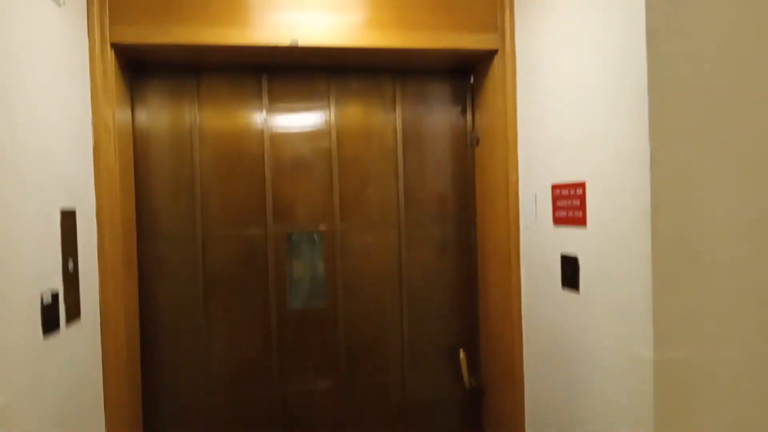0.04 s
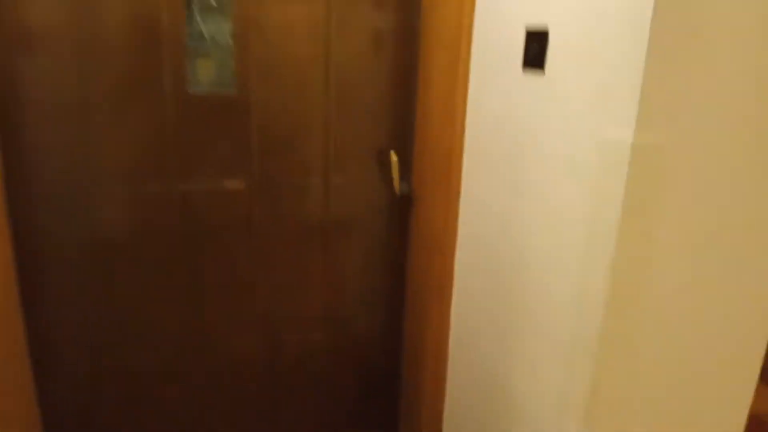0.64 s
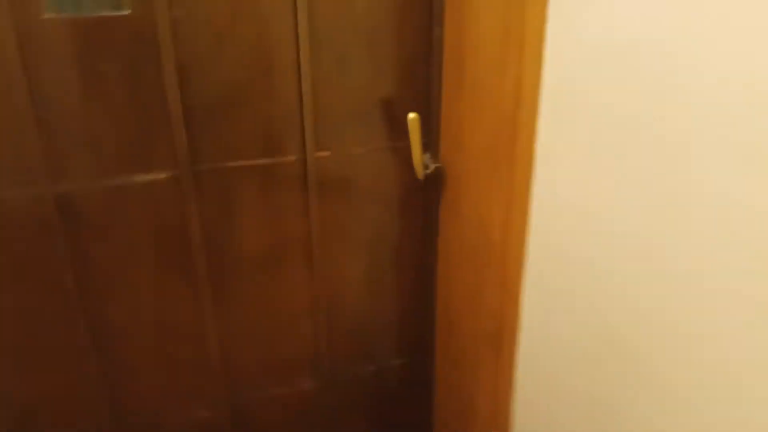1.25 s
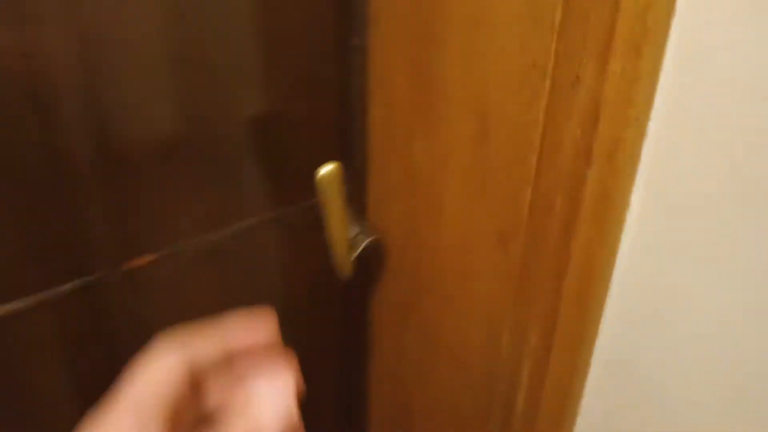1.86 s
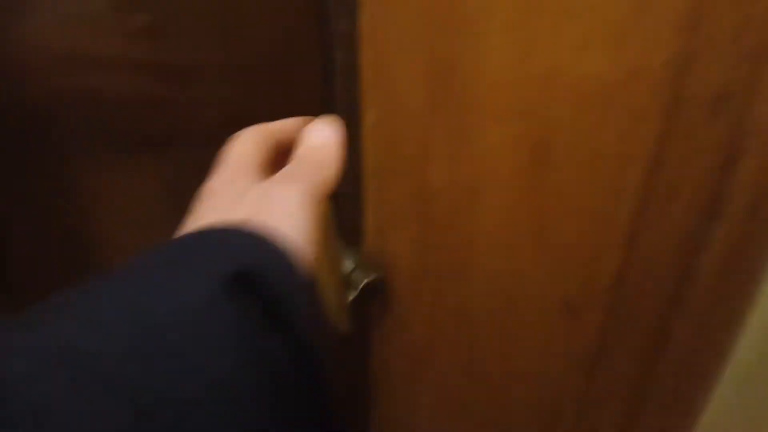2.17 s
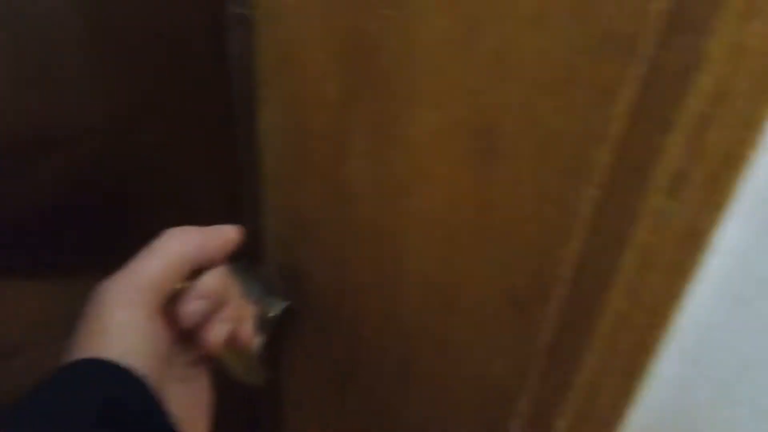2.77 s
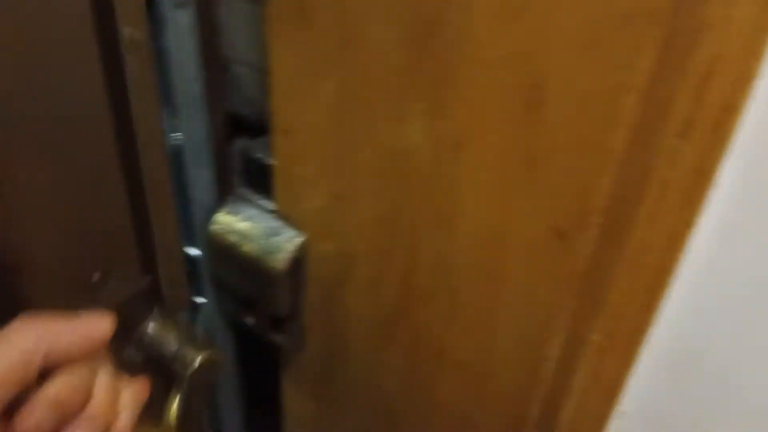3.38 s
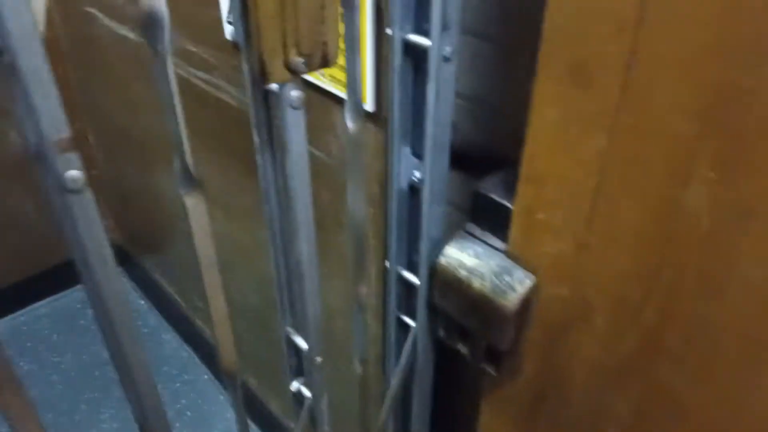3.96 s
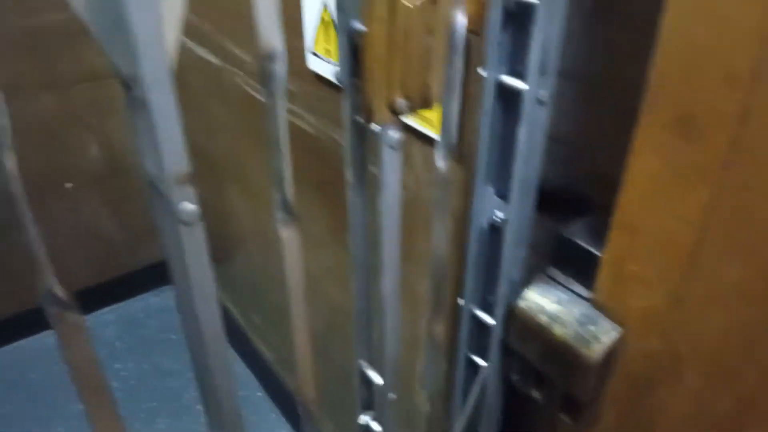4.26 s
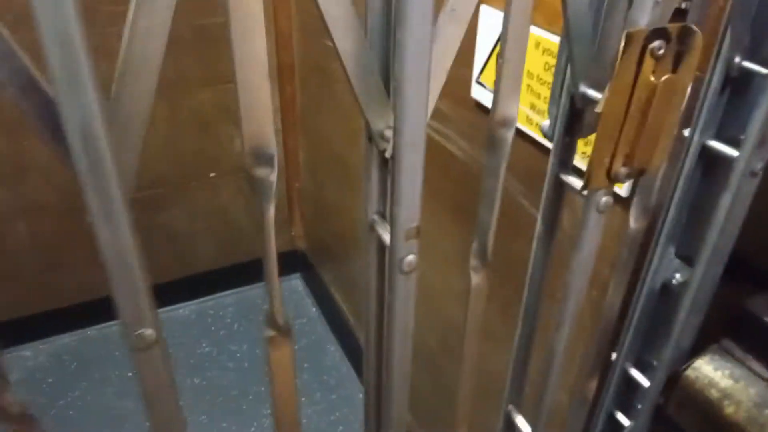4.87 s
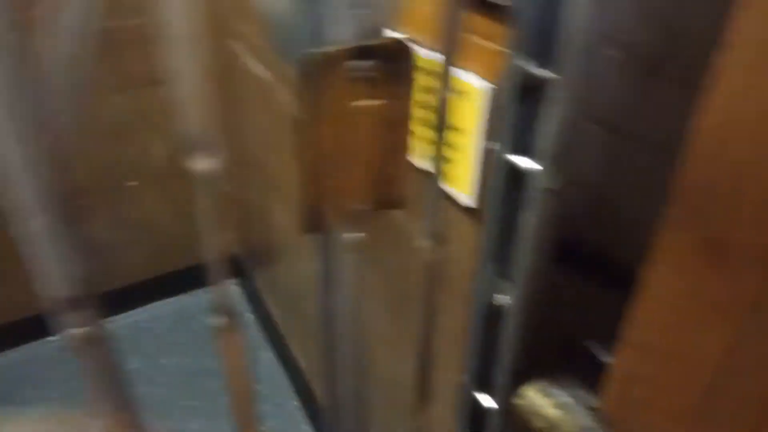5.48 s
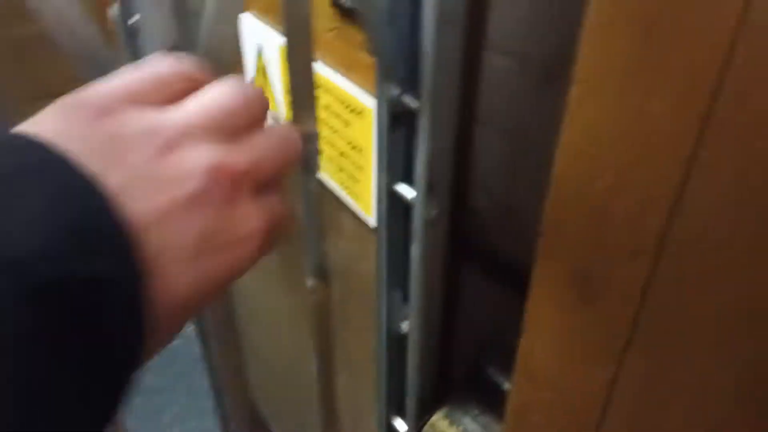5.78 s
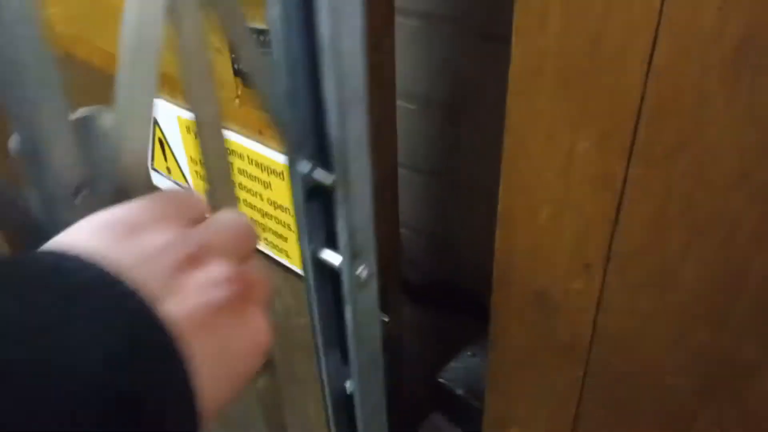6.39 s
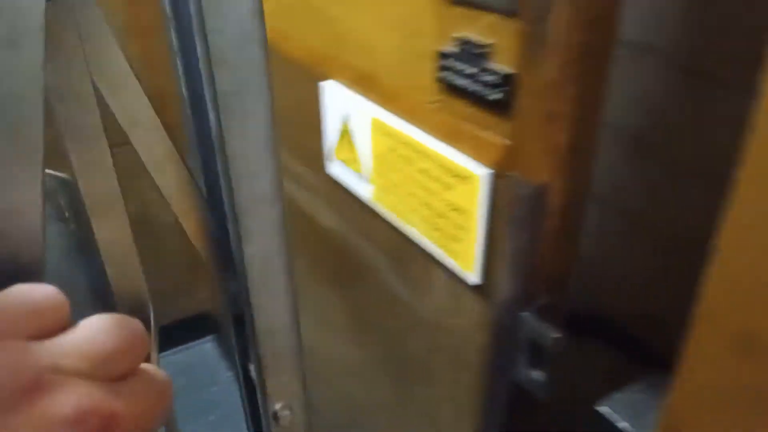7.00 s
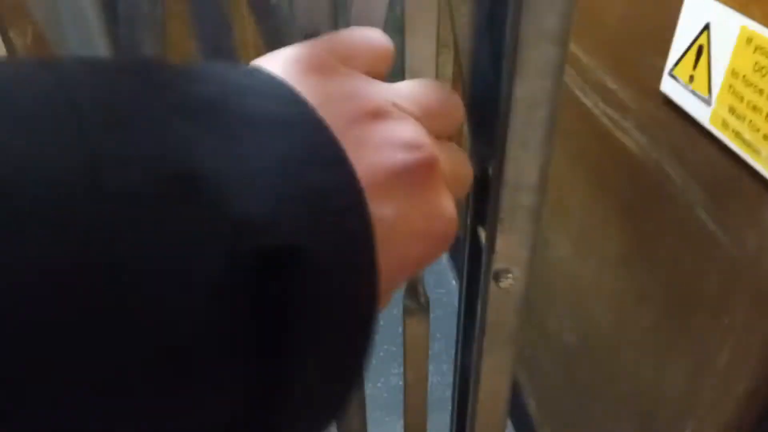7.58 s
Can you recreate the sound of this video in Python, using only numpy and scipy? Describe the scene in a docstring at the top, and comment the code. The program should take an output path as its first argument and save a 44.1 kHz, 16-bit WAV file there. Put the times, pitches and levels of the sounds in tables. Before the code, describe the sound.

In a small hallway, a few heels thump and a coat rustles faintly as someone walks up to an old elevator. The latch clacks and knocks, then the wooden door scrapes free and rolls open with squeaks, clinks and a juddering rumble. After a short lull, the folding steel gate is pushed aside with a loud, high screech and clanking bars. The microphone is close.

```python
"""Small hallway, old lift. Someone walks up, heels thumping, coat rustling, and unlatches the wooden door.
Impacts thud in the panel and ring the steelwork. The door scrapes free, rolls on a gritty track and
judders, amid brief squeaks and clinks. The hanging car booms as it is leaned on. The folding steel gate
is pushed open: its dry pivots stick and slip in a screech while the bars clank."""
import sys
import numpy as np
from scipy import signal
from scipy.fft import rfft, irfft, next_fast_len
from scipy.io import wavfile
from scipy.ndimage import uniform_filter1d

SR = 44100
rng = np.random.default_rng(int(sys.argv[2]) if len(sys.argv) > 2 else 0)


def wav_out(sig):
    """Save sig, one row per channel (or a flat mono array), as 16-bit PCM at SR to the path in sys.argv[1]."""
    wavfile.write(sys.argv[1], SR, np.round(np.clip(np.atleast_2d(sig).T, -1, 1) * 32767).astype(np.int16))


N = 336924
TIME = np.arange(N) / SR
TAIL_TIME = TIME[:SR // 2]

# spectra of room tone and coat rustle, each with a thin high hiss: f/Hz, level/dB
ROOM_SPECTRUM = [(25, -24.5), (50, 2.5), (150, 3.5), (280, -5.5), (600, -16.5), (1800, -14.5),
                 (3600, -23.5), (6200, -17.5), (8400, -43), (13500, -43), (15500, -19.5)]
RUSTLE_SPECTRUM = [(1000, -22), (2300, -6.5), (3800, -11), (5700, -0.5), (6900, -3.5), (8500, -25.5),
                   (13000, -27), (15500, -7)]
# coat movements: t/s, length/s, level/dB
RUSTLES = [(.5, 1.56, -69.5), (1.25, 0.22, -62), (2.25, 0.19, -67), (5.0, 0.31, -58.5),
           (5.32, 0.026, -52.5), (5.52, 0.19, -61), (5.8, 0.16, -68.5), (7.5, .13, -68)]
# footfalls and soft bumps: t/s, peak/dB, t60/s
STEPS = [(0.807, -56, 0.44), (1.057, -59, .2), (1.351, -24.5, 0.072), (1.372, -28.5, 0.22),
         (1.526, -42.5, 0.71), (1.606, -35.5, 0.24), (1.797, -31, 0.3), (2.003, -27, 0.1),
         (2.203, -53.5, 0.46), (2.45, -43, 0.95), (3.186, -20, 0.043), (3.511, -27, 0.07),
         (5.276, -49, 0.13), (5.419, -48, 0.12), (5.483, -45, 0.25), (5.725, -44, 0.18),
         (5.839, -49.5, 0.57), (6.837, -24, 0.14), (7.232, -50, 0.16)]
# shoe scuffs, low body of latch knocks, metal jingle, gate clank: t/s, length/s, f/Hz, level/dB
NOISE_BURSTS = [(0.792, 0.13, 1480, -59.5), (0.796, 0.027, 3600, -61), (0.814, 0.15, 328, -57),
                (.864, 0.085, 900, -56), (0.867, 0.096, 3520, -63.5), (1.055, 0.065, 675, -63.5),
                (1.382, 0.13, 1420, -61), (1.586, 0.085, 5250, -62), (1.78, 0.22, 5080, -59),
                (1.882, 0.015, 3530, -51), (1.762, 0.15, 1540, -58.5), (1.846, 0.043, 534, -40.5),
                (1.852, 0.11, 1940, -54), (1.901, 0.026, 834, -53), (2.363, 0.025, 500, -53),
                (2.559, 0.068, 310, -29.5), (2.817, 0.069, 360, -37), (2.954, 0.043, 398, -34.5),
                (3.408, 0.033, 730, -37), (4.12, 0.14, 1500, -49), (4.126, 0.1, 4760, -43),
                (5.534, 0.14, 2180, -70), (6.387, 0.12, 1010, -43), (6.745, 0.064, 1200, -50.5),
                (6.826, 0.04, 5196, -40)]
# squeaks, handle and latch rings, metal clinks: t/s, length/s, f/Hz, level/dB
BRIEF_TONES = [(1.056, .04, 2970, -62.5), (1.21, 0.027, 4450, -63), (2.22, 0.11, 5620, -61),
               (3.535, 0.18, 5080, -37.5), (3.545, 0.098, 5803, -37), (3.6, 0.052, 6220, -41),
               (3.65, 0.05, 2590, -42.5), (3.828, 0.067, 6640, -38.5), (3.837, 0.02, 1150, -41.5),
               (3.835, 0.041, 4560, -41.5), (3.855, 0.063, 1852, -46), (3.895, 0.036, 6800, -42),
               (3.98, 0.06, 1370, -52.5), (4.13, .07, 1100, -51), (4.244, 0.14, 4760, -39),
               (6.158, 0.37, 262, -58), (6.752, 0.026, 1214, -40.5), (6.758, 0.024, 958, -41.5),
               (7.3, 0.13, 4340, -44.5), (7.31, 0.083, 2810, -46), (7.394, 0.05, 1916, -53.5)]
# modes of panel and floor, and of the steelwork: f/Hz, level/dB, t60 factor
WOOD_MODES = [(79.3, 7, 1.32), (113, 6.5, 1.2), (152, 11.5, 0.8), (169, 1.5, 1.77), (219.5, -1, 1.13),
              (251, -2, 0.46), (305, -9, 1.7), (390, -13.5, 1.6)]
STEEL_MODES = [(1210, -17, 0.37), (1503, -5, 0.83), (2283, -1.5, 0.8), (2650, -33, 0.42),
               (3260, -9.5, 0.93), (4700, -3.5, 0.34), (5100, -2, 1), (4860, -1, 0.43), (5830, 11, 0.25),
               (6430, 1.5, 0.7), (6460, -2, 0.49), (9590, 5.5, 0.65), (10660, 1.5, 0.74), (11000, -6, 0.4)]
# latch, door and gate impacts: t/s, thud/dB, clack/dB, ring/dB, t60/s
KNOCKS = [(2.555, -35, -34.5, -37.5, 0.083), (2.565, -29.5, -39, -40.5, 0.24),
          (2.607, -29.5, -45, -47, 0.31), (2.683, -56, -52.5, -47, 0.12), (2.709, -41.5, -48.5, -51, 0.45),
          (2.821, -28.5, -34, -44, 0.21), (2.85, -37, -37, -36.5, 0.15), (2.929, -45, -40, -37, 0.046),
          (2.951, -28, -40.5, -39, .15), (2.974, -29.5, -36, -40.5, .06), (3.002, -35, -37, -36, 0.16),
          (3.061, -39, -39, -32.5, 0.19), (3.125, -44, -48, -31, 0.053), (3.411, -35, -42, -55, 0.14),
          (3.485, -37, -51, -63, 0.076), (3.537, -74, -89, -34.5, 0.2), (3.729, -71, -48.5, -48.5, 0.18),
          (3.828, -60, -51, -44, 0.16), (3.894, -57, -48, -43.5, 0.12), (4.065, -46, -62, -51, 0.18),
          (4.22, -44, -52, -45, 0.15), (5.712, -66, -65, -73, 0.018), (5.831, -74, -66.5, -67.5, 0.17),
          (5.934, -76, -59, -60, .15), (6.362, -56, -41.5, -39, 0.3), (6.39, -54, -32.5, -38, 0.096),
          (6.397, -49, -32, -54, 0.058), (6.975, -80, -46, -37, 0.28), (7.118, -79, -42, -67, 0.19)]
# heaves of the hand: t/s, length/s, level/dB
DOOR_HEAVES = [(2.58, 0.067, -37.5), (2.84, 0.075, -29.5), (2.96, .03, -27.5), (3.04, 0.43, -32.5),
               (3.62, 0.32, -39), (3.98, 0.32, -54)]
GATE_HEAVES = [(5.309, 0.73, -61.5), (6.099, 0.9, -52.5), (6.75, 0.071, -32.5), (6.833, 0.06, -29),
               (6.941, 0.02, -34.5), (7.033, .03, -38), (7.153, 0.16, -45)]
# spectra of the shaken frame: f/Hz, level/dB
DOOR_RUMBLE_SPECTRUM = [(21, -35), (35, -27), (59, -3), (80, 10.5), (129, -9), (157, 2), (172, 2),
                        (232, -14), (284, -0.5), (373, -7), (405, -26.5), (435, -11.5), (600, -17.5),
                        (780, -43), (1320, -120)]
GATE_RUMBLE_SPECTRUM = [(21, -57), (35, -19), (97, 1.5), (114, -1), (176, 0), (267, -18.5), (305, -15.5),
                        (351, -28), (425, -17), (600, -25.5), (780, -62), (1320, -120)]
# door's scraping force and rolling speed: t/s, level/dB
SCRAPE_LEVEL = [(2.9, -58.5), (3.022, -36.5), (3.04, -43), (3.236, -34.5), (3.254, -30.5), (3.39, -31),
                (3.482, -44), (3.49, -35.5), (3.53, -49)]
ROLL_LEVEL = [(3.57, -58), (3.614, -47.5), (3.748, -55.5), (3.808, -57.5), (3.84, -47.5), (4.088, -64),
              (4.166, -48.5), (4.212, -53.5), (4.272, -32.5), (4.44, -28.5), (4.62, -33.5), (4.762, -33.5),
              (4.792, -41), (4.9, -39), (4.966, -55), (5.374, -71), (5.4, -86)]
# scrape, roll and rasp spectra: f/Hz, level/dB
SCRAPE_SPECTRUM = [(240, -50), (400, 17.5), (504, -24.5), (826, -9.5), (1030, -14.5), (1220, -6.5),
                   (1710, -10), (2510, -1.5), (3020, -8.5), (5190, -6), (6340, -2.5), (8900, -22),
                   (13500, -25.5), (15000, -13), (16000, -17.5)]
ROLL_SPECTRUM = [(240, -1), (400, 8), (453, -10), (504, -4.5), (562, -8.5), (765, 4.5), (1350, 6),
                 (2290, 4.5), (3260, -6), (5270, -9), (5960, -2.5), (6740, -8), (8370, -26), (13500, -38.5),
                 (16000, -22)]
RASP_SPECTRUM = [(300, 8.5), (500, -3), (800, -69.5), (1200, -49), (1600, 5), (2500, 0.5), (3800, 6),
                 (5200, 10), (6800, 11), (7600, -16), (8400, -44), (11000, -44), (13500, -33), (15500, -6)]
# track and hanger resonances: f/Hz, width/Hz, level/dB
TRACK_MODES = [(753, 3.9, 13), (825, 29, 3), (1520, 39, -2), (1840, 130, -8), (2270, 120, -6),
               (2820, 25, -21), (3860, 29, -54), (5980, 53, -37), (6640, 430, 13)]
# reflection from the door's edge as the gap opens: t/s, delay/s
GAP_ECHO = [(3.5, 0.0007), (3.85, 0.0012), (4.05, 0.0021), (4.25, 0.001875), (5.0, 0.003)]
# door judder: t/s, fundamental/dB, overtones/dB
JUDDER_LEVELS = [(3.93, -53, -63), (4.01, -36.5, -68), (4.252, -29, -61), (4.316, -34, -41),
                 (4.394, -70, -38.5), (4.514, -36, -41.5), (4.724, -36.5, -49.5), (4.9, -58, -48),
                 (5.03, -48.5, -63), (5.15, -70, -70)]
# judder overtones: multiple, level/dB
JUDDER_OVERTONES = [(2, 1.5), (3, -5.5), (4, -6.5), (5, -9)]
# lift car booms: t/s, length/s, f/Hz, level/dB
CAR_BOOMS = [(5.41, 0.063, 74, -49.5), (5.83, 0.19, 59, -48), (6.715, 0.16, 102, -44.5),
             (6.92, 0.23, 115, -40.5)]
# pushes on the gate: t/s, length/s, tone/dB, rasp/dB
PUSHES = [(6.299, 0.38, -25, -37), (6.712, 0.047, -41, -46.5), (6.821, 0.084, -43, -42),
          (6.925, .2, -24.5, -46.5), (7.202, 0.035, -43, -60), (7.296, 0.13, -38, -61.5)]
# pivot binding: t/s, length/s, level/dB
BINDS = [(6.51, .115, -25.5), (6.98, 0.064, -48)]
# pivot stick-slip pitch: t/s, f/Hz
SCREECH_PITCH = [(6.25, 1603), (6.296, 1526), (6.452, 1486), (6.976, 1512), (6.99, 1483), (7.25, 1506),
                 (7.332, 1484), (7.48, 1501)]
# screech partials: multiple, level/dB
LOW_PARTIALS = [(1, -4.5), (2, 3)]
HIGH_PARTIALS = [(4, -1), (5, -16), (6, -24), (7, -40), (8, -40.5), (9, -43), (10, -39)]
BIND_PARTIALS = [(1.5, -17), (2.5, -12.5), (3.5, -6.5), (4.32, -5), (4.5, 2), (5.5, -20), (6.5, -28)]


def from_db(db):
    """Decibels to gain."""
    return 10 ** (np.asarray(db) / 20)


def rms_one(x):
    """Scale to rms 1."""
    return x / np.sqrt(np.mean(x ** 2) + 1e-20)


def even(x):
    """Flatten slow swells; rms 1."""
    return x / np.sqrt(uniform_filter1d(x * x, size=2600) + 1e-9)


def add(out, start_s, sound):
    """Mix in at start_s."""
    start = int(start_s * SR)
    out[start:start + len(sound)] += sound[:N - start]


def dying(t60_s):
    """Exponential decay, 0.5 s long."""
    return np.exp(-np.log(1000) * TAIL_TIME / t60_s)


def swell(length_s):
    """Envelope: fast rise, slower fall."""
    return np.sin(np.pi * np.linspace(0, 1, int(length_s * SR)) ** 0.37)


def gains(curve, fade_in_s=0.06, fade_out_s=0.13):
    """One gain per dB column, fading beyond the curve's ends."""
    s, *columns = np.transpose(curve)
    inside = np.clip(1 + np.minimum((TIME - s[0]) / fade_in_s, (s[-1] - TIME) / fade_out_s), 0, 1)
    return [inside * from_db(np.interp(TIME, s, db)) for db in columns]


def strokes_db(rows, rise_db_per_s, fall_db_per_s):
    """Rise, hold, fall for rows of t/s, length/s, level/dB; the loudest wins."""
    return np.max([db - rise_db_per_s * np.maximum(s - TIME, 0)
                   - fall_db_per_s * np.maximum(TIME - s - length_s, 0)
                   for s, length_s, db in rows], axis=0)


def stroke_gain(rows, rise_db_per_s, fall_db_per_s):
    """Strokes as a gain."""
    return from_db(np.maximum(strokes_db(rows, rise_db_per_s, fall_db_per_s), -200))


def band(x, low_hz, high_hz, order=3):
    """Causal band-pass."""
    edges_hz = np.clip([low_hz, high_hz], 10, .45 * SR)
    return signal.sosfilt(signal.butter(order, edges_hz, "band", fs=SR, output="sos"), x + 1e-18)


def resonance(x, hz, width_hz):
    """Two-pole resonator, peak gain 1."""
    r = np.exp(-np.pi * width_hz / SR)
    feedback = [1, -2 * r * np.cos(2 * np.pi * hz / SR), r * r]
    return signal.lfilter(np.array([1, 0, -1]) * (1 - r * r) / 2, feedback, x)


def colour(x, spectrum):
    """Filter by a spectrum; rms 1."""
    hz, db = np.transpose(spectrum)
    size = next_fast_len(N)
    bins_hz = np.maximum(np.fft.rfftfreq(size, 1 / SR), 1)
    low_cut = np.minimum(bins_hz / hz[0], 1) ** 2
    shape = from_db(np.interp(np.log(bins_hz), np.log(hz), db))
    return rms_one(irfft(rfft(x, size) * low_cut * shape, size)[:N])


def drift(rate_hz):
    """Smooth random wander; rms 1."""
    r = np.exp(-40 * np.pi * rate_hz / SR)
    slow = signal.lfilter([1], [1, -2 * r, r * r], rng.standard_normal(N // 20 + 2002))[2000:]
    return np.interp(np.arange(N) / 20, np.arange(len(slow)), rms_one(slow))


def grains(per_s, spread_db):
    """Tiny uneven collisions on a rough surface; rms 1."""
    sizes = from_db(spread_db * np.minimum(rng.exponential(1, N), 4)) * rng.choice([-1, 1], N)
    return rms_one(sizes * (rng.random(N) < per_s / SR))


def notes(rows, waver):
    """One swelling, wavering sine per row."""
    out = np.zeros(N)
    wobble = 1 + waver * drift(170)
    for s, length_s, hz, db in rows:
        stroke = swell(length_s)
        phase = 2 * np.pi * hz * np.cumsum(wobble[int(s * SR):][:len(stroke)]) / SR
        add(out, s, from_db(db) * np.sqrt(2) * stroke * np.sin(phase))
    return out


def hall(x, wet_db, bass_t60_s=.45, treble_t60_s=.28):
    """Direct sound plus diffuse hallway tail; treble dies first."""
    noise = rng.standard_normal(SR // 2)
    bass = band(noise, 40, 2740, order=2) * dying(bass_t60_s)
    treble = band(noise, 2000, 11400, order=1) * dying(treble_t60_s)
    tail = (bass + treble) * np.minimum(TAIL_TIME / 0.013, 1)
    wet = from_db(wet_db)
    return (x + wet * signal.fftconvolve(x, tail / np.linalg.norm(tail))[:N]) / np.hypot(1, wet)


def room_tone(far_db=-67.5, near_db=-61.5, walk_s=3):
    """Room tone with a thin high hiss, growing on the way to the shaft."""
    gain = from_db(np.interp(TIME, [0, walk_s], [far_db, near_db]))
    return gain * colour(rng.standard_normal(N), ROOM_SPECTRUM)


def coat():
    """Moving cloth rustles."""
    gain = stroke_gain(RUSTLES, rise_db_per_s=157, fall_db_per_s=191)
    return gain * colour(rng.standard_normal(N), RUSTLE_SPECTRUM)


def noise_bursts():
    """Short band noise: shoe scuffs, low body of latch knocks, metal jingle, gate clank."""
    out = np.zeros(N)
    for s, length_s, hz, db in NOISE_BURSTS:
        noise = rms_one(band(rng.standard_normal(SR // 2), hz / 1.76, hz * 1.28))
        stroke = swell(length_s)
        add(out, s, from_db(db) * stroke * noise[:len(stroke)])
    return hall(out, wet_db=-16.5)


def thud(t60_s, scatter):
    """A soft blow rings the wood's modes over a diffuse boom; peak 1."""
    modes = sum(from_db(db + rng.normal(0, 3)) * np.sin(2 * np.pi * hz * TAIL_TIME) * dying(t60_s * hold)
                for hz, db, hold in WOOD_MODES)
    boom = rms_one(band(rng.standard_normal(SR // 2), 37, 487)) * dying(t60_s * 1.24)
    sound = band(modes + scatter * boom, 65, 270)
    return sound / np.abs(sound).max()


def footsteps():
    """Heels and soft bumps thump the wood."""
    out = np.zeros(N)
    for s, db, t60_s in STEPS:
        add(out, s, from_db(db) * thud(t60_s, scatter=0.34))
    return out


def brief_tones():
    """Short sines: squeaks, handle and latch rings, metal clinks."""
    return hall(notes(BRIEF_TONES, waver=0.02), wet_db=-10.5)


def steel_ring(t60_s, count):
    """Loose steelwork: many unrelated modes, each struck at random strength."""
    modes = np.zeros(SR // 4 + 1, complex)   # 2 Hz bins
    hz = (np.linspace(np.sqrt(400), np.sqrt(16000), count) + rng.uniform(-1, 1, count)) ** 2
    modes[(hz / 2).astype(int)] = rng.standard_normal(count) + 1j * rng.standard_normal(count)
    return rms_one(irfft(modes, SR // 2)) * dying(t60_s)


def steel_blow(t60_s, modes_db=-12, rise_s=0.0015):
    """Struck steel: main modes, dense ring, short crack."""
    modes = sum(from_db(db + modes_db + rng.normal(0, 4))
                * np.sin(2 * np.pi * (hz * TAIL_TIME + rng.random())) * dying(t60_s * hold)
                for hz, db, hold in STEEL_MODES)
    ring = steel_ring(t60_s, count=420)
    crack = 0.58 * rng.standard_normal(SR // 2) * dying(0.0065)
    return (modes + ring + crack) * np.minimum(TAIL_TIME / rise_s, 1)


def knocks(heavy_db=-15, heavy_hz=509, db_per_octave=35, graze_lead_s=0.0067, graze_db=-20):
    """Latch, door and gate impacts ring the steel and thud the panel."""
    metal, wood = np.zeros(N), np.zeros(N)
    for s, thud_db, clack_db, ring_db, t60_s in KNOCKS:
        lowest_hz = heavy_hz * 2 ** ((heavy_db - thud_db) / db_per_octave)   # lighter parts ring higher
        sizzle_db = ring_db - 19 + 0.35 * (ring_db - clack_db)
        blow = band(steel_blow(t60_s), lowest_hz, .45 * SR, order=4)
        clack = band(blow, 227, 2970)
        ring = band(blow, 3900, 6980, order=4)
        sizzle = band(blow, 9700, 17000)
        for db, part in ((clack_db + 1, clack), (ring_db + 2, ring), (sizzle_db, sizzle)):
            contact = from_db(db) * part / np.std(part[:SR // 40])
            add(metal, s, contact)
            add(metal, s - graze_lead_s, from_db(graze_db) * contact)   # loose parts graze first
        add(wood, s, from_db(thud_db + 7) * thud(t60_s, scatter=2.7))
    return hall(metal, wet_db=-10.5) + wood


def frame_rumble():
    """Door and gate shake the wooden frame at each heave."""
    door_gain = stroke_gain(DOOR_HEAVES, rise_db_per_s=700, fall_db_per_s=139)
    gate_gain = stroke_gain(GATE_HEAVES, rise_db_per_s=700, fall_db_per_s=139)
    door_shake = colour(grains(per_s=830, spread_db=-1), DOOR_RUMBLE_SPECTRUM)
    gate_shake = colour(grains(per_s=590, spread_db=0), GATE_RUMBLE_SPECTRUM)
    return from_db(-3.5) * door_gain * door_shake + from_db(-7.5) * gate_gain * gate_shake


def rattling(grit, restless_db, parts):
    """Loose parts ring in turn as the contact point travels."""
    out = np.zeros(N)
    for _ in range(parts):
        drive = grit * from_db(restless_db * drift(9))
        out += signal.fftconvolve(drive, steel_ring(.09, count=170))[:N]
    return rms_one(out)


def sliding(curve, spectrum, chatter, uneven_db, ticks_db, ring_db, track_db, echo,
            hiss_db, dulling_db_per_s):
    """Grit excites track and loose steelwork; the hiss fades as the door moves off."""
    grit = grains(per_s=3100, spread_db=1.5) * chatter * from_db(uneven_db * drift(26))
    grit += from_db(ticks_db) * grains(per_s=40, spread_db=3)
    body = rms_one(grit) + from_db(ring_db) * rattling(grit, restless_db=6, parts=6)
    track = sum(from_db(db) * resonance(body, hz, width_hz) for hz, width_hz, db in TRACK_MODES)
    body = hall(body + from_db(track_db) * track, wet_db=-20.5)
    delay_s = np.interp(TIME, *np.transpose(GAP_ECHO))
    body += echo * np.interp(TIME - delay_s, TIME, body)   # comb sweeps down
    body = colour(body, spectrum)
    mids = even(band(body, 518, 4400, order=4))
    hiss = even(band(body, 3380, .45 * SR, order=4))
    hiss_gain = from_db(hiss_db - dulling_db_per_s * np.maximum(TIME - curve[0][0], 0))
    gain, = gains(curve)
    return gain * (mids + hiss_gain * hiss)


def judder(phase):
    """The door shakes its hangers: a hum with unsteady overtones."""
    fundamental_gain, overtone_gain = gains(JUDDER_LEVELS)
    hum = from_db(1.2 * drift(25)) * fundamental_gain * np.sin(phase)
    for k, db in JUDDER_OVERTONES:
        hum += overtone_gain * from_db(db - 2 + 3 * drift(8)) * np.sin(k * phase + .5 * drift(25))
    return np.sqrt(2) * hum


def door(judder_hz=100.7):
    """The door scrapes free, then rolls; its judder modulates the roller grit."""
    phase = 2 * np.pi * np.cumsum(judder_hz * (1 + 0.0184 * drift(7.4))) / SR
    hum = judder(phase)
    scrape = sliding(SCRAPE_LEVEL, SCRAPE_SPECTRUM, chatter=1, uneven_db=0, ticks_db=-12,
                     ring_db=-7.5, track_db=-14, echo=0.067, hiss_db=5.5, dulling_db_per_s=12.5)
    roll = sliding(ROLL_LEVEL, ROLL_SPECTRUM, chatter=1 + 0.13 * np.cos(phase), uneven_db=1.37,
                   ticks_db=-15, ring_db=-4, track_db=-11, echo=0.18, hiss_db=7, dulling_db_per_s=9)
    return hum + from_db(1) * scrape + from_db(-0.96) * roll


def car_booms():
    """The hanging car booms when leaned on."""
    return notes(CAR_BOOMS, waver=0.076)


def pivot_drive(low_lead_s=0.035, bite_s=0.081):
    """Gains of low, third and high partials and rasp; each push sings first, then bites."""
    lows, highs, bites = [], [], []
    for s, length_s, tone_db, bite_db in PUSHES:
        lag_s = min(bite_s, length_s / 2)
        lows.append((s - low_lead_s, length_s + low_lead_s, -22.5 + 0.67 * tone_db))
        highs.append((s, length_s, tone_db))
        bites.append((s + lag_s, length_s - lag_s, bite_db))
    low_db = strokes_db(lows, rise_db_per_s=1797, fall_db_per_s=653)
    high_db = strokes_db(highs, rise_db_per_s=850, fall_db_per_s=653)
    rasp_db = strokes_db(bites, rise_db_per_s=546, fall_db_per_s=289)
    third_db = 1 + high_db + 0.28 * (rasp_db - high_db)
    return from_db(np.maximum([low_db, third_db, high_db, rasp_db], -200))


def gate_screech(waver=0.00177, jitter=0.00587, flutter_db=2.7, bars_db=5):
    """A dry pivot sticks and slips; its rasp rings the bars, and binding doubles its period."""
    pitch_hz = np.interp(TIME, *np.transpose(SCREECH_PITCH))
    pitch_hz *= 1 + waver * drift(34.4) + jitter * drift(254)
    phase = 2 * np.pi * np.cumsum(pitch_hz) / SR
    low_gain, third_gain, high_gain, rasp_gain = pivot_drive()
    bind_gain = stroke_gain(BINDS, rise_db_per_s=398, fall_db_per_s=350)
    groups = ((low_gain, LOW_PARTIALS, .5), (third_gain, [(3, 0)], .2),
              (high_gain, HIGH_PARTIALS, .17), (bind_gain * from_db(-3), BIND_PARTIALS, .5))
    tone = np.zeros(N)
    for gain, partials, roughness in groups:
        for k, db in partials:
            partial = (1 + roughness * drift(70)) * np.sin(k * phase)
            partial += roughness * drift(110) * np.cos(k * phase)
            tone += gain * from_db(db) * rms_one(partial * from_db(flutter_db * drift(37.5)))
    slips = grains(per_s=4300, spread_db=-3) * (1 + 0.53 * np.cos(phase))
    bars = from_db(bars_db) * rattling(slips, restless_db=4, parts=2)
    rasp = rasp_gain * even(colour(slips + bars, RASP_SPECTRUM))
    sizzle = bind_gain * rms_one(band(slips, 8100, .45 * SR))
    return hall(from_db(-3) * tone + from_db(4) * rasp + from_db(-23) * sizzle, wet_db=-13)


def scene():
    """Lift, walker and hallway; mono."""
    lift = knocks() + door() + frame_rumble() + gate_screech() + brief_tones() + car_booms()
    return (footsteps() + noise_bursts() + lift + room_tone() + coat())[None]


def record(dry):
    """Steep low-pass at 15.9 kHz."""
    return signal.sosfilt(signal.ellip(10, .2, 80, 15900, fs=SR, output="sos"), dry)


dry = scene()
out = record(dry)
wav_out(out)
```